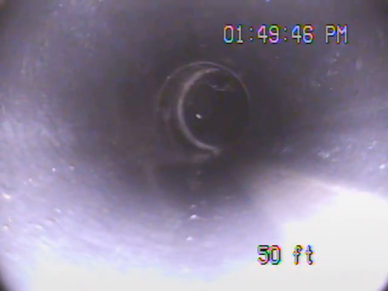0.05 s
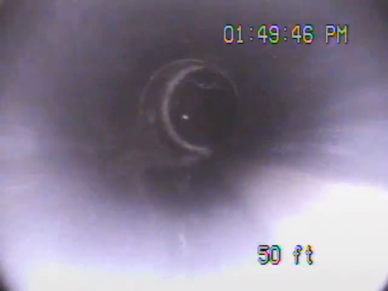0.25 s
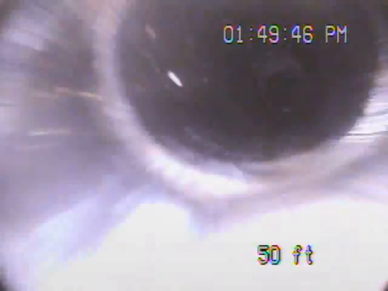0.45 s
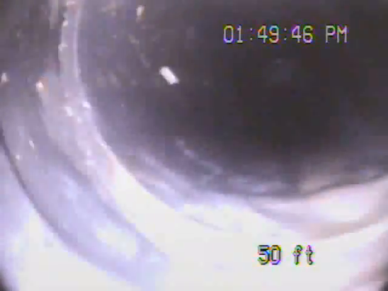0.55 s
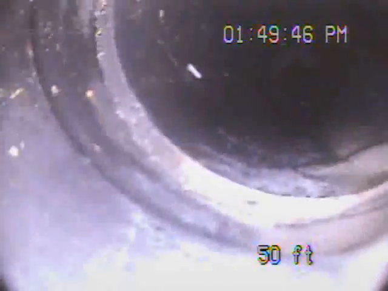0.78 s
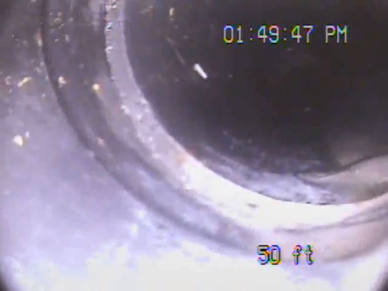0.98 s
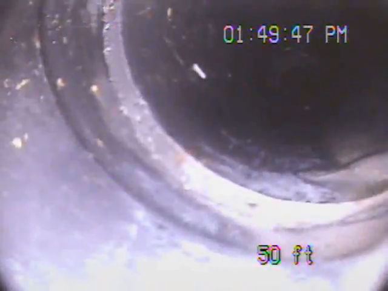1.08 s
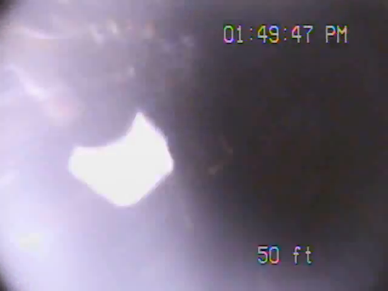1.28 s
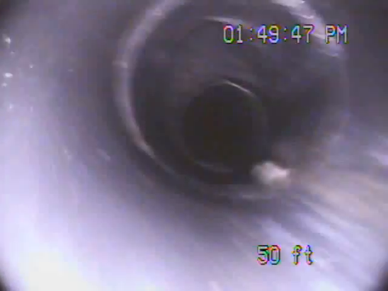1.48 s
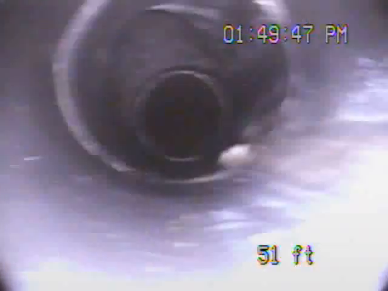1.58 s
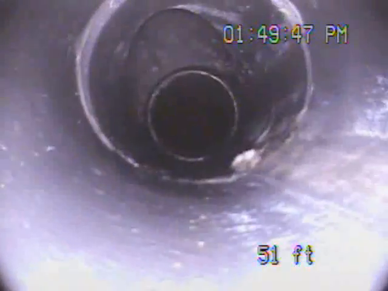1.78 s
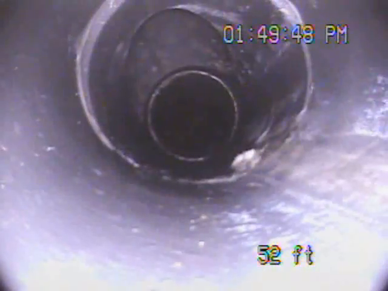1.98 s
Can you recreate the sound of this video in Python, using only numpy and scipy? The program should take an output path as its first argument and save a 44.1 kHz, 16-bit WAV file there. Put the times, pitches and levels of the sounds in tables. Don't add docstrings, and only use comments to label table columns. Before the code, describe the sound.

A stiff drain-camera cable slaps its steel reel frame in bright, uneven clacks, after a brief scrape and dull knocks; a second scraping pull and sharper cracks follow, then faint knocks, close up in a small hard room.

```python
import sys
import numpy as np
from scipy import signal
from scipy.fft import rfft, irfft, next_fast_len
from scipy.io import wavfile
from scipy.ndimage import uniform_filter1d

SR = 44100
rng = np.random.default_rng(int(sys.argv[2]) if len(sys.argv) > 2 else 0)


def transcribe(u):
    v = np.clip(np.atleast_2d(u).T, -1, 1)
    q = np.round(v * 32767).astype(np.int16)
    wavfile.write(sys.argv[1], SR, q)


def gain_from_db(level_db):
    decades = np.asarray(level_db, float) / 20
    return 10 ** decades


N = 90404

# pitch_hz [Hz], level_db [dB]
FRAME_NOTES = [(1860, -15), (2900, 8), (3280, 9.5), (3800, -5), (4600, -10), (5100, -21.5), (5800, 10.5),
               (6600, -13), (7700, -42.5)]
# pitch_hz [Hz], level_db [dB]
CASE_NOTES = [(205, -15), (330, -30), (560, -12), (750, -3), (1085, -1.5), (1423, -7)]
# freq_hz [Hz], level_db [dB per Hz]
CRACK_COLOUR = [(59, -90), (100, -60), (394, -34.5), (1040, -10.5), (2170, -4), (3320, -4.5), (4180, -16),
                (5740, -11), (15500, -61.5)]

FRAME_WIDTH_HZ, CASE_WIDTH_HZ = 330, 190
SPREAD_DB = 3.5
RISE_SHARE = .85


def colour(x, table):
    f, db = np.array(table).T
    bins_hz = np.arange(1025) * SR / 2048
    log_gain = np.interp(np.log(bins_hz + 1), np.log(f), db) * np.log(10) / 20
    cepstrum = irfft(log_gain)
    cepstrum[1:1024] *= 2
    cepstrum[1025:] = 0
    impulse = irfft(np.exp(rfft(cepstrum)))[:1024]
    return signal.fftconvolve(x, impulse)[:len(x)]


def ring(x, hz, width):
    return signal.lfilter(*signal.iirpeak(hz, hz / max(width, 1), SR), x)


def body(x, peaks, width, vary_db):
    return sum(gain_from_db(db + v) * ring(x, f * (1 + v / 150), width) for (f, db), v in zip(peaks, vary_db))


def unit(x):
    return x / np.sqrt(np.mean(x ** 2))


def top(x):
    return x / np.abs(x).max()


def walk(rate):
    k = int(SR / rate)
    return unit(uniform_filter1d(uniform_filter1d(rng.standard_normal(N), k), k))


def contact(noise, ms):
    t = np.arange(len(noise)) / SR * 1000 / max(ms, .3)
    let_go = 0.83
    return noise * (1 - np.exp(-(t / RISE_SHARE) ** 2)) * np.exp(-t ** let_go)


def add(out, x, s, ms):
    i = max(int((s - RISE_SHARE * ms / 1000) * SR), 0)
    out[i:i + len(x)] += x[:len(out) - i]


def floor():
    # freq_hz [Hz], level_db [dB per Hz]
    hiss_colour = [(15, -40), (25, 10), (60, 1), (227, -0.5), (266, -5.5), (313, 2), (388, -5.5),
                   (3160, -11), (8790, -15), (15500, -17)]
    # time_s [s], level_db [dB]
    rumble_course = [(0, -58), (.55, -50.5), (.7, -54), (.9, -60.5), (1.2, -46.5), (1.55, -48),
                     (1.8, -48.5), (2.05, -43.5)]
    # pitch_hz [Hz], level_db [dB rms]
    whine = [(11779, -66), (15676, -69), (15735, -62)]
    hiss_db, whine_db, rumble_hz = -49, 2, 90
    hiss_apart_db, rumble_apart_db = -19, -15
    t = np.arange(N) / SR
    hiss = [gain_from_db(hiss_db) * unit(colour(rng.standard_normal(N), hiss_colour)) for _ in range(2)]
    level = gain_from_db(np.interp(t, *np.array(rumble_course).T) + 1.6 * walk(6))
    rumble = []
    for _ in range(2):
        narrow = ring(rng.standard_normal(N), rumble_hz, 94)
        rumble.append(level * unit(ring(narrow, rumble_hz, 150)))
    lines = 0
    for hz, db in whine:
        lines = lines + np.sqrt(2) * gain_from_db(db + whine_db + walk(20)) * np.sin(2 * np.pi * hz * t)
    side = gain_from_db(hiss_apart_db) * hiss[1] + gain_from_db(rumble_apart_db) * rumble[1]
    return hiss[0] + rumble[0] + lines, side


def room(x):
    # freq_hz [Hz], t60_s [s]
    decay = [(200, .26), (750, .3), (1600, .23), (2700, .26), (3300, .19), (6000, .18), (10000, .13)]
    room_db, apart_db, gap_ms = -8, -27, 5
    t = np.arange(SR // 2) / SR
    f, t60 = np.array(decay).T
    tail = 0
    for hz in 60 * 2 ** np.arange(0, 8.1, 1 / 3):
        sos = signal.butter(2, [hz / 1.12, hz * 1.12], "band", fs=SR, output="sos")
        band = signal.sosfilt(sos, rng.standard_normal((5, len(t))))
        band_t60 = max(np.interp(np.log(hz), np.log(f), t60), .03)
        tail = tail + band * gain_from_db(-60 * t / band_t60)
    tail = tail * (1 - np.exp(-(t * 1000 / gap_ms) ** 2))
    tail = tail / np.sqrt(np.sum(tail[0] ** 2))
    place = np.arange(N) / SR / .007
    mid = 0
    for k in range(4):
        share = np.maximum(np.cos(np.pi / 2 * (place - k)), 0)
        mid = mid + signal.fftconvolve(x * share, tail[k])[:N]
    side = signal.fftconvolve(x, tail[-1])[:N]
    return gain_from_db(room_db) * mid, gain_from_db(room_db + apart_db) * side


def knocks():
    # hit_s [s] (where the build-up ends), level_db [dB peak], pitch_hz [Hz], contact_ms [ms]
    blows = [(.028, -30, 1130, 3.5), (0.063, -40, 970, 5.1), (0.095, -26, 1060, 4.4), (.145, -31, 200, 3.9),
             (.198, -19, 1200, 5.4), (.244, -21, 180, 6), (0.57, -23.5, 1150, 4.6), (0.45, -34, 670, 3.46),
             (.535, -28, 230, 7.4), (.990, -41.5, 456, 10), (1.349, -33, 523, 4.8), (1.4, -34, 1050, 2.87),
             (1.869, -28, 520, 1.6), (1.886, -28, 620, 2.6), (1.903, -20, 690, 2.6),
             (2.012, -31, 1530, 5.0), (2.0005, -24, 420, 1.0), (1.4, -33.5, 620, 5.5),
             (0.05, -38.5, 176, 11), (1.5, -31, 285, 12), (1.6, -27, 480, 10), (2.024, -31, 730, 5.3),
             (2.030, -29, 313, 30), (1.872, -32.5, 1210, 5), (1.876, -24, 590, 2.8),
             (0.084, -28.5, 670, 2.5), (.27, -30, 150, 17), (0.28, -42, 88, 3.7), (0.19, -29.5, 710, 8),
             (2.043, -32.5, 1870, 6.6)]
    note_width_hz, box_db, tick_db = 110, -13, -22
    out = np.zeros(N)
    noise = rng.standard_normal((len(blows), 4096))
    vary = rng.standard_normal((len(blows), 8))
    for k, (s, db, hz, ms) in enumerate(blows):
        hit = contact(noise[k], ms)
        note = top(ring(ring(hit, hz, note_width_hz), hz, 3 * note_width_hz))
        box = gain_from_db(box_db) * top(body(hit, CASE_NOTES, CASE_WIDTH_HZ, SPREAD_DB * vary[k]))
        tick = gain_from_db(tick_db) * top(colour(hit, CRACK_COLOUR))
        add(out, gain_from_db(db) * top(note + box + tick), s, ms)
    return out


def squeaks():
    # start_s [s], length_s [s], from_hz [Hz], to_hz [Hz], level_db [dB]
    slips = [
        (1.671, .021, 4250, 2750, -29),
        (1.506, .018, 6600, 5500, -27),
        (.672, .022, 4200, 6600, -54),
    ]
    out = np.zeros(N)
    for s, length, from_hz, to_hz, db in slips:
        u = np.linspace(0, 1, int(length * SR))
        pitch_hz = to_hz + (from_hz - to_hz) * (1 - u) ** 1.71
        phase = 2 * np.pi * np.cumsum(pitch_hz) / SR
        whistle = np.sin(phase) + gain_from_db(-14) * np.sin(1.6 * phase)
        swell = np.sin(np.pi * u ** .6)
        rough = gain_from_db(db + 2.5 * walk(500)[:len(u)])
        add(out, rough * swell * whistle, s, 0)
    return out


def slide():
    # time_s [s], level_db [dB], low_share_db [dB], free_span_hz [Hz]
    strokes = [
        [(0, -32.5, 2.5, 3040), (.035, -41, 9.5, 2870), (.075, -63.5, 12, 2660), (.105, -36, 4, 2830),
         (.125, -29, -6, 2960), (.15, -32.5, 1.5, 4000), (.172, -24.5, -4.5, 4900), (.2, -29, -19.5, 3400),
         (.238, -33, 5, 2970)],
        [(.36, -37.5, -33, 2840), (.42, -44.5, -16, 3080), (.45, -68.5, 18, 3540), (.51, -45, 14.5, 3400),
         (.6, -53, 3.5, 2700), (.69, -49.5, -6, 2660), (.86, -64, -6, 2910)],
        [(.99, -69, -8, 3360), (1.04, -34, -13, 4170), (1.08, -31, -22.5, 4600), (1.15, -29.5, -3, 3900),
         (1.2, -26, -5, 3350), (1.25, -33, -10, 4110), (1.33, -47, 5.5, 3900), (1.42, -53, 3, 3180),
         (1.47, -48.5, 8.5, 3190)],
        [(1.57, -48, 22.5, 3400), (1.63, -52.5, 2, 2700), (1.72, -53, -1, 3100), (1.8, -47, 1, 3100),
         (1.85, -49.5, 0, 2710), (1.97, -53.5, 8, 3250), (2.01, -54.5, 11, 2900), (2.05, -43.5, 13.5, 3950)],
    ]
    # freq_hz [Hz], level_db [dB per Hz]
    scrape_colour = [(900, -30), (1600, -13), (2600, -10), (3600, -1), (4700, 0.5), (7000, -9),
                     (10000, -26), (15500, -38)]
    grains_per_s, grain_db = 12000, 1.5
    ring_db, note_db, note_width_hz = -8, -5, 650
    air_db, air_per_db = -23, .8
    t = np.arange(N) / SR
    strength = gain_from_db(grain_db * np.minimum(rng.exponential(size=N), 3))
    grains = (rng.random(N) < grains_per_s / SR) * rng.standard_normal(N) * strength
    grains = grains * gain_from_db(2.6 * walk(50))
    frame = unit(body(grains, FRAME_NOTES, FRAME_WIDTH_HZ, np.zeros(20)))
    high = unit(unit(colour(grains, scrape_colour)) + gain_from_db(ring_db) * frame)
    low = unit(body(grains, CASE_NOTES, 2 * CASE_WIDTH_HZ, np.zeros(20)))
    air = unit(ring(rng.standard_normal(N), 9660, 5000))
    lowpass = signal.butter(2, note_width_hz / 2, fs=SR)
    out = 0
    for rows in strokes:
        s, db, low_db, hz = np.array(rows).T
        turn = np.exp(2j * np.pi * np.cumsum(np.interp(t, s, hz)) / SR)
        note = unit(np.real(turn * signal.lfilter(*lowpass, grains / turn)))
        on = uniform_filter1d(((t >= s[0]) & (t <= s[-1])) * 1., size=600)
        level = np.interp(t, s, db)
        mix = high + gain_from_db(note_db) * note + gain_from_db(np.interp(t, s, low_db)) * low
        mix = mix + gain_from_db(air_db + air_per_db * (level + 28)) * air
        out = out + on * gain_from_db(level - 1.0) * mix
    return out


def clacks():
    # hit_s [s] (where the build-up ends), level_db [dB peak], low_ring_db [dB], pitch_hz
    # [Hz], contact_ms [ms]
    slaps = [(.0815, -22, -8, 4120, 2.2), (.113, -27, -28, 3950, 2.8), (.189, -19, -15, 3950, 3.5),
             (.237, -2, -14, 4410, 1.6), (.242, 5, -21.5, 3430, 5.1), (.258, 5.5, -17.5, 3670, 6.1),
             (.266, 0.1, -31, 3460, 9.1), (.323, -13, -39, 4300, 1.3), (.387, -13, -17.5, 3780, 2.6),
             (.457, -31, -39, 3800, 3.1), (.478, -17, -47, 3750, 8.1), (.525, -8, -28, 3200, 6.0),
             (.542, -13, -22, 3000, 6.0), (1.130, -16.5, -31, 3920, 6.1), (1.170, -10, -21.5, 3520, 7.1),
             (1.2045, 5, -24, 3280, 2.6), (1.218, -9, -16, 3400, 4.5), (1.430, -28, -8, 5000, 2.2),
             (1.472, -14, -28, 4200, 1.3), (1.4915, 4, -26, 4050, 1.2), (1.505, -8, -27, 3800, 4.5),
             (1.5455, -6, -27, 4050, 2.6), (1.671, -31, -6, 3600, 4.0), (1.899, -26, -8, 3500, 2.6),
             (.250, -5, -20, 3300, 3.5), (.203, -19, -18, 3500, 5.5), (1.2005, -9, -22, 3300, 2.0),
             (1.4695, -22, -20, 3600, 1.0), (1.540, -21, -25, 3300, 3.5), (1.561, -18, -20, 3000, 4.5)]
    dull_hz, dull_oct_per_db = 15000, .055
    focus_db_per_oct = 14
    crack_db, own_db, own_width_hz, low_gain_db = -1.5, 2.5, 600, 10.5
    out = np.zeros(N)
    noise = rng.standard_normal((len(slaps), 4096))
    vary = rng.standard_normal((len(slaps), 24))
    for k, (s, db, low_db, hz, ms) in enumerate(slaps):
        edge_hz = np.clip(dull_hz * 2 ** (dull_oct_per_db * db), 4000, 20000)
        hit = signal.lfilter(*signal.butter(3, edge_hz, fs=SR), contact(noise[k], ms))
        focused = [(f, g - focus_db_per_oct * abs(np.log2(f / hz))) for f, g in FRAME_NOTES]
        frame = top(body(hit, focused, FRAME_WIDTH_HZ, SPREAD_DB * vary[k]))
        high = frame + gain_from_db(own_db) * top(ring(hit, hz, own_width_hz))
        low = top(body(hit, CASE_NOTES, CASE_WIDTH_HZ, SPREAD_DB * vary[k, 12:]))
        crack = gain_from_db(crack_db) * top(colour(hit, CRACK_COLOUR))
        add(out, gain_from_db(db) * (top(high + crack) + gain_from_db(low_db + low_gain_db) * low), s, ms)
    return signal.lfilter(*signal.butter(2, 480, "high", fs=SR), out)


def reel(x):
    # pitch_hz [Hz], t60_s [s], level_db [dB]
    hoop = [(760, .5, -14), (2730, .3, -20), (3280, .04, -27), (3830, .07, -24), (4830, .08, -22),
            (5780, .06, -24)]
    return sum(gain_from_db(db) * np.sqrt(t60 * 1000) * ring(x, hz, 1.5 / t60) for hz, t60, db in hoop)


def scene():
    lag_samples, pan_db = .96, .45
    hits = clacks() + slide()
    near = hits + reel(hits) + squeaks()
    near = near - .58 * ring(near, 2330, 400)
    soft = knocks()
    wet, wet_side = room(near + gain_from_db(-5.5) * soft)
    bed, bed_side = floor()
    mid, side = near + soft + wet + bed, wet_side + bed_side
    size = next_fast_len(N + 64)
    delay = np.exp(-2j * np.pi * np.arange(size // 2 + 1) / size * lag_samples)
    late = irfft(rfft(mid, size) * delay, size)[:N]
    return np.array([gain_from_db(pan_db / 2) * late + side, gain_from_db(-pan_db / 2) * mid - side])


def top_cut(x):
    return signal.sosfilt(signal.butter(12, 15800, fs=SR, output="sos"), x)


def record(dry):
    lowpass = signal.ellip(10, .3, 80, 15800, fs=SR, output="sos")
    dry = signal.sosfilt(lowpass, dry)
    return top_cut(np.clip(dry, -1, 1))


dry = scene()
out = record(dry)
transcribe(out)
```